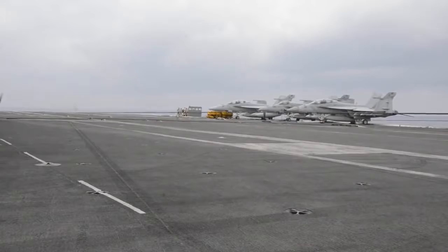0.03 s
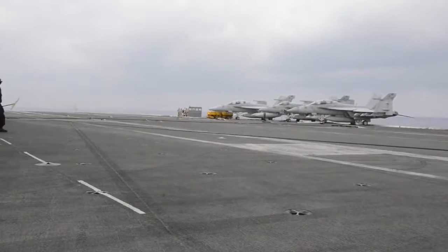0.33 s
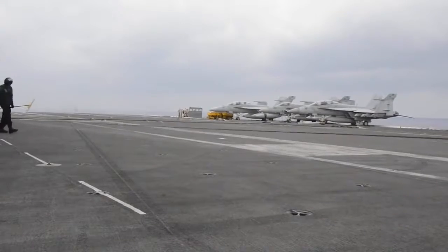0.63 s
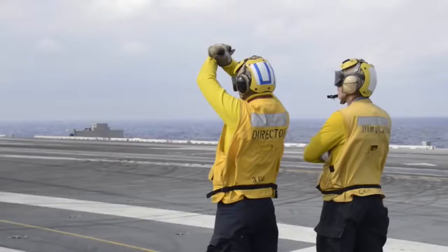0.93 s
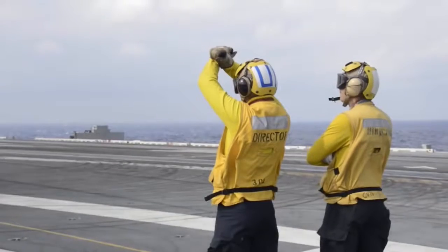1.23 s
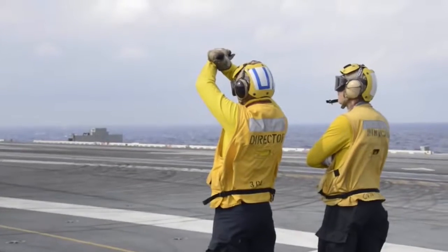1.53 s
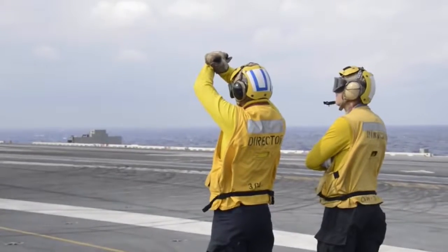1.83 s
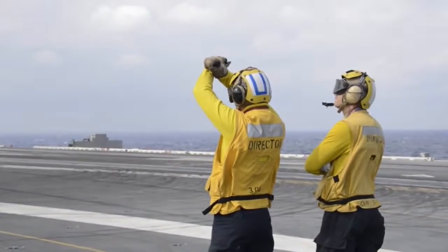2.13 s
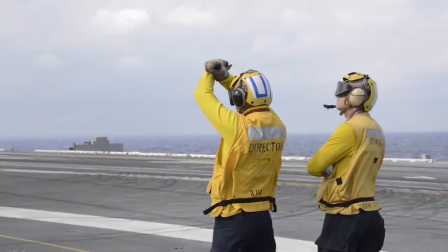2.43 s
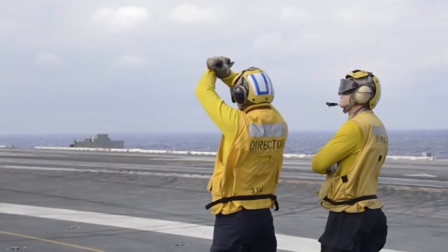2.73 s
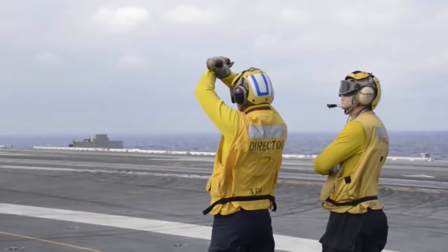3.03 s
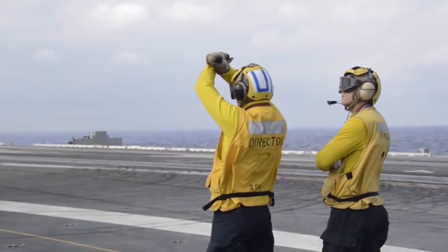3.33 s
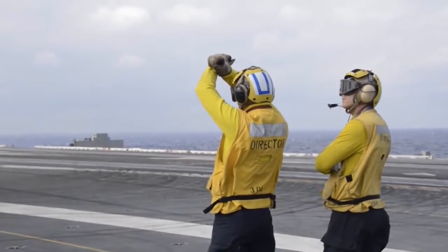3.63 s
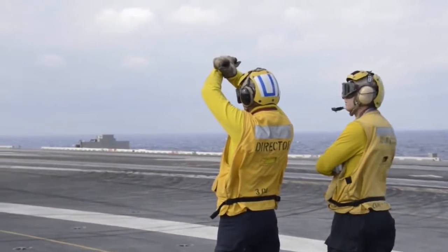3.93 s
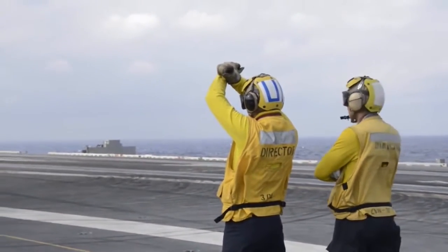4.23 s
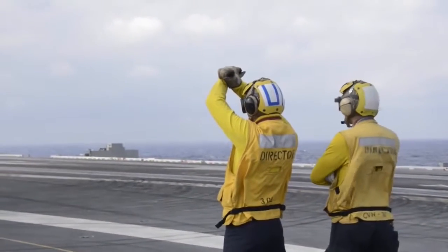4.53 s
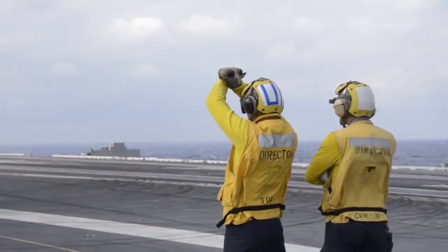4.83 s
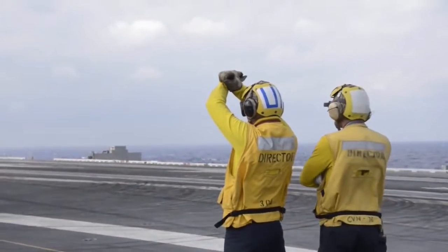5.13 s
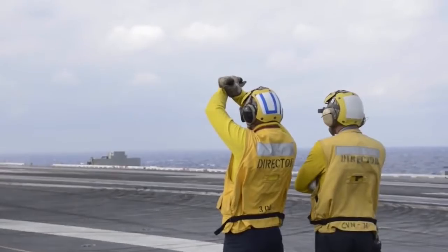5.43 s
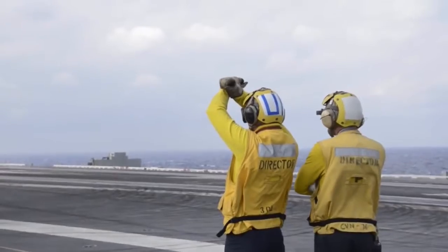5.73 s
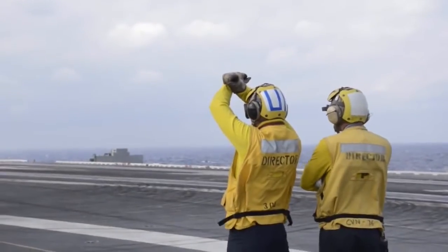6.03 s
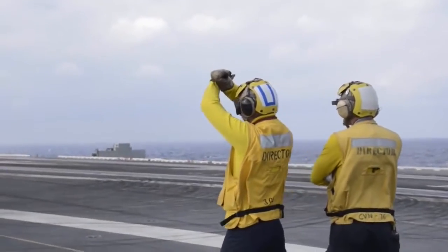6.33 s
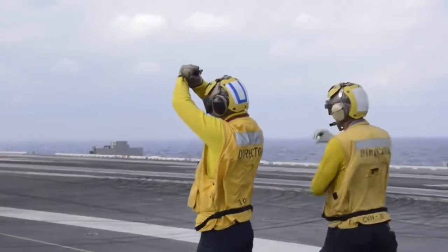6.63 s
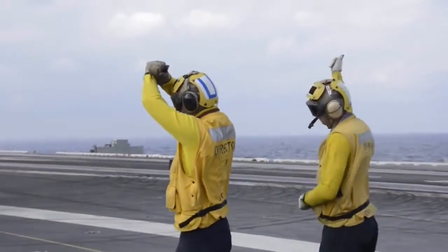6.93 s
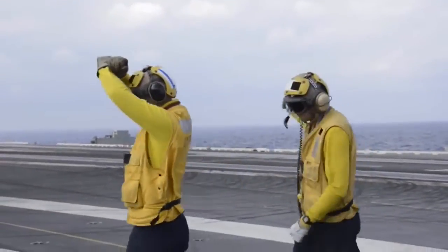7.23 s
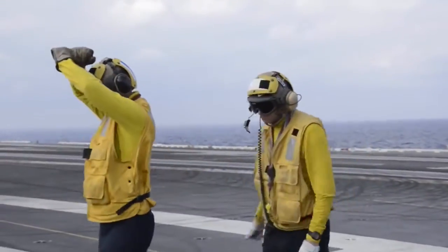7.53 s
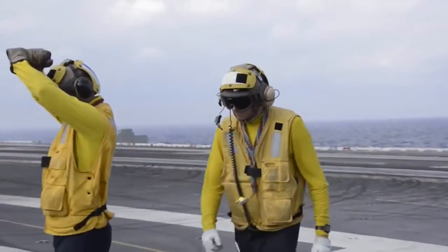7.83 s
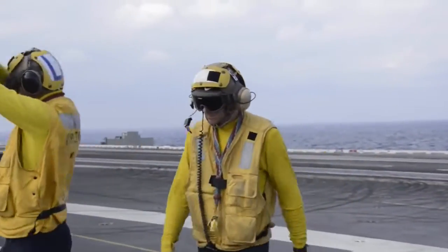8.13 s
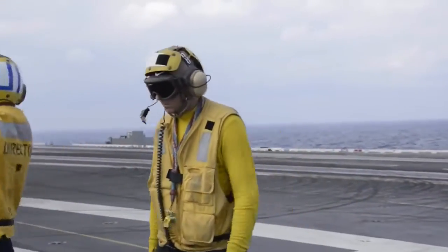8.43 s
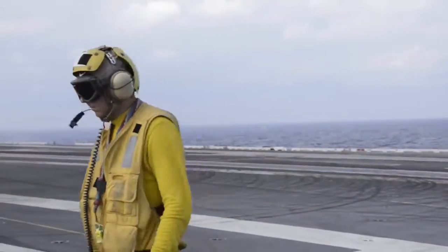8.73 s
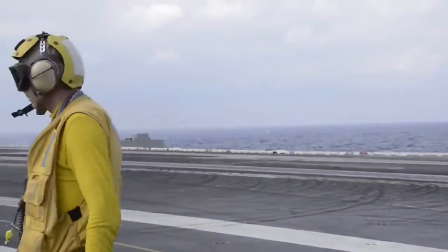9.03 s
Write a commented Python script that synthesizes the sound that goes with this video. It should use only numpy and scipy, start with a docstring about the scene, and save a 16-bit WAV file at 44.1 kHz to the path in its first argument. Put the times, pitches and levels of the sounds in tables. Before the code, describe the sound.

Overloaded jet engine roar stops abruptly; idling turbines whine in light wind before a passing jet swells and recedes.

```python
"""On a carrier's flight deck, a jet at full power overloads the microphone, then cuts dead at 0.9 s.
The open deck follows: idling turbines whine over the ship's hum while wind bumps the microphone.
From about 2.4 s a jet flies past, its roar swelling and fading in the turbulent air and sweeping
against its own echo off the steel deck. Toward the end the hiss recedes and it sinks to a rumble."""
import sys
import numpy as np
from scipy import signal
from scipy.fft import rfft, irfft, next_fast_len
from scipy.io import wavfile
from scipy.ndimage import uniform_filter1d, map_coordinates

SR = 44100
rng = np.random.default_rng(int(sys.argv[2]) if len(sys.argv) > 2 else 0)


def wav_record(signal):
    """Record a signal, one row per channel, as 16-bit PCM in the file named by sys.argv[1]."""
    frames = np.transpose(np.atleast_2d(signal))
    bounded = np.clip(frames, -1, 1)
    # unit amplitude maps onto the largest positive 16-bit level
    quanta = np.round(bounded * 32767).astype(np.int16)
    wavfile.write(sys.argv[1], SR, quanta)


N = 404838
TIME = np.arange(N) / SR
FRAMES = np.arange(N // 256 + 5) * 256 / SR  # spectrogram frame times, s
HZ = np.fft.rfftfreq(1024, 1 / SR)  # spectrogram bins


# Exhaust EQ at full power: f/Hz, level/dB
BLAST_EQ = [(25, -29), (60, -30), (100, -13), (180, -4.5), (270, 3.5), (480, 1.5), (900, -5), (1450, -7),
            (2400, -11.5), (3300, -18), (7500, -23.5), (10000, -27.5), (15500, -41.5)]
# Drive into the overload, with low buffeting building up: t/s, level/dB, bass lift/dB
BLAST_DRIVE = [(0, -8, -14), (.3, -11, 5), (.5, -10.5, -5), (.7, -11.5, 8), (.82, -13, 10.5),
               (.89, -14.5, 13.5)]

def full_power_jet(buffet_hz=150, shocks_per_s=260, shock_hz=1800, crackle_db=-17, ceiling=0.46):
    """Exhaust turbulence and steep little shocks, squashed by the overloaded microphone."""
    _, bass_db = follow(BLAST_DRIVE, FRAMES[:, None])
    buffet_db = bass_db / (1 + (HZ / buffet_hz) ** 4)
    roar = unit_rms(spectral_noise(eq_curve(BLAST_EQ, HZ) + buffet_db, patchy_db=0.73))
    shocks = (rng.random(N) < shocks_per_s / SR) * rng.exponential(1, N)
    # each shock jumps at once and relaxes
    crackle = filtered(shocks, lambda f: 1j * f / (shock_hz + 1j * f) ** 2 / (1 + (f / 10500) ** 6))
    level_db, _ = follow(BLAST_DRIVE, TIME)
    flutter_db = 0.62 * drift(5.65, 39.9, TIME)
    pressure = (roar + amp(crackle_db) * unit_rms(crackle)) * amp(level_db - 0.85 + flutter_db)
    return pressure / (1 + (pressure / ceiling) ** 4) ** (1 / 4)  # soft clip


# Flyby EQ, nose-on and tail-on: f/Hz, level/dB
COMING_EQ = [(60, -49), (130, -12.5), (300, 1.5), (750, -1), (1450, -1), (2400, -8), (3400, -17),
             (4400, -28), (6000, -32.5), (8000, -40.5), (9600, -37), (12000, -44), (13700, -40),
             (15700, -45)]
GOING_EQ = [(30, -45), (70, -21.5), (140, -1), (255, -7), (380, -4), (850, -5), (1600, -10), (2100, -13),
            (2650, -20), (3500, -18), (4800, -30), (6700, -28), (8300, -37.5), (15700, -56)]
# Morph between the two: t/s, share of the tail-on EQ/0-1
EQ_MORPH = [(4.6, 0.08), (5.5, 0.42), (6.2, 1), (9.2, 0.76)]
# Bell of tearing hiss that slides down as the nozzle turns into view: t/s, f/Hz, lift/dB
TEAR_BELL = [(3.5, 5410, 1), (4.4, 4970, 5), (4.85, 4900, 7.5), (5.4, 4700, 4.5), (5.85, 4200, 5),
             (6.2, 3700, 3), (7.5, 3400, 4), (8.5, 3570, 5), (9.1, 3540, -1.5)]
# Rumble, roar and hiss bands: bottom f/Hz, top f/Hz
FLYBY_BANDS = [(170, 500), (600, 2200), (2800, 8000)]

def passing_jet(tear_octaves=0.29, flutter_hz=3000, trim_db=0.57, entry_s=2.35, fade_in_s=0.29):
    """Far exhaust noise; the air fades its rumble, roar and hiss, and shakes the treble most."""
    going, = follow(EQ_MORPH, FRAMES[:, None])
    tear_hz, tear_db = follow(TEAR_BELL, FRAMES[:, None])
    colour_db = (1 - going) * eq_curve(COMING_EQ, HZ) + going * eq_curve(GOING_EQ, HZ)
    colour_db += tear_db * np.exp(-(np.log2((HZ + 1) / tear_hz) / tear_octaves) ** 2)
    # a three-point EQ pulls each band toward its fader
    lifts_db = []
    for fader_db, (bottom, top) in zip(band_faders(), FLYBY_BANDS):
        power = (amp(colour_db[:, (HZ > bottom) & (HZ < top)]) ** 2).sum(1)
        lifts_db.append(fader_db - 10 * np.log10(power))
    colour_db += np.array([eq_curve([(380, rumble), (900, roar), (3500, hiss)], HZ)
                           for rumble, roar, hiss in zip(*lifts_db)])
    # the flutter eases as the jet turns away
    flutter_db = (1 - 0.3 * going) * drift(7, 32, FRAMES)[:, None] * 2 * HZ / (HZ + flutter_hz)
    exhaust = spectral_noise(colour_db + flutter_db + trim_db, patchy_db=1.5)
    fade_in = np.clip((TIME - entry_s) / fade_in_s, 0, 1)
    return rasp(exhaust * fade_in)


# Slow fader ride of the pass; the rumble holds to the end: t/s, rumble/dB, roar/dB, hiss/dB
FLYBY_RIDE = [(2.5, -59.5, -57.5, -77), (2.92, -55.5, -45.5, -63.5), (3.3, -52.5, -38.5, -55),
              (3.7, -48.5, -43, -59), (4.4, -46.5, -40.3, -55), (5.0, -44.5, -40, -53),
              (5.5, -46.5, -40.5, -51.5), (6.2, -45.5, -42, -54), (7.3, -44, -44, -58),
              (8.4, -42.5, -43, -60), (9.0, -46, -50, -65.5), (9.18, -42, -48, -66)]
# Swells on top of the ride: peak t/s, half length/s, roar lift/dB, hiss lift/dB
EDDY_SWELLS = [(3.054, 0.081, 2.5, 3), (3.389, 0.047, 10, 9), (3.502, 0.064, 11, 10), (3.937, 0.1, 6.5, 6),
               (4.137, 0.11, 9.5, 12), (4.558, 0.03, 1.5, 4.5), (4.86, 0.13, 4.5, 9.5), (5.14, 0.15, 4, 7),
               (5.367, 0.084, 5.5, 7), (5.65, 0.11, 1.5, 5.5), (5.837, 0.026, 0, 5.5),
               (5.996, 0.026, 5, 5.5), (6.09, 0.021, -1.5, 3.5), (6.29, 0.054, -0.5, 3.5),
               (6.594, 0.049, 7, 0.5), (7.206, .09, 5.5, 3), (7.494, 0.037, 4, 8), (7.903, 0.062, 5, 5.5),
               (8.58, 0.2, 5, 1.5)]

def band_faders(rumble_share=0.23):
    """Rumble, roar and hiss in dB: the slow pass, swelling as eddies focus the sound on the deck."""
    rumble, roar, hiss = follow(FLYBY_RIDE, FRAMES)
    for peak_s, half_s, roar_db, hiss_db in EDDY_SWELLS:
        swell = np.exp(-((FRAMES - peak_s) / half_s) ** 2)
        rumble += rumble_share * roar_db * swell  # long waves are hardly focused
        roar += roar_db * swell
        hiss += hiss_db * swell
    return rumble, roar, hiss


def rasp(exhaust, depth_db=2.2, corner_hz=3500):
    """The exhaust's top end tears in millisecond bursts."""
    treble = filtered(exhaust, lambda f: f ** 2 / (f ** 2 + corner_hz ** 2))
    bursts = unit_rms(amp(depth_db * drift(110, 900, TIME)))
    return exhaust + treble * (bursts - 1)


# Delay of the deck bounce, longest when the jet stands highest: t/s, lag/ms
BOUNCE_DELAY = [(2.6, .95), (3.1, 1.15), (3.4, 1.8), (4.05, 2.55), (4.7, 3.55), (5.15, 3.98), (5.8, 4.4),
                (6.4, 4.42), (7.5, 3.9), (8.1, 3.35), (9.2, 3.25)]

def deck_echo(direct, dull_hz=1500, lag_rad=0.43, base_gain=0.35, abeam_s=5.12, abeam_half_s=0.79):
    """The steel deck returns a duller copy; its moving delay sweeps a flanging comb through the roar."""
    lag_ms, = follow(BOUNCE_DELAY, TIME)
    lag_ms += 0.06 * drift(2, 14, TIME)  # turbulence bends the paths and blurs the upper teeth

    def rolloff(f):
        return 1 / np.hypot(1, f / dull_hz)

    # the bounce dulls the treble and holds back the phase of the bass
    bounce = filtered(direct, lambda f: rolloff(f) * np.exp(-1j * lag_rad * rolloff(f)))
    echo = map_coordinates(bounce, [(TIME - lag_ms / 1000) * SR], order=3)
    # strongest while the jet is abeam, over bare steel
    echo_gain = base_gain + 0.27 * np.exp(-((TIME - abeam_s) / abeam_half_s) ** 2)
    # direct sound and echo share the power
    return filtered(direct + echo_gain * echo, lambda f: 1 / np.hypot(1, base_gain * rolloff(f)))


# Wind thumps: peak t/s, half length/s, level/dB, low-pass f/Hz
WIND_BUMPS = [(1.038, 0.068, -52, 357), (1.205, 0.025, -50.5, 260), (1.56, 0.0093, -47, 150),
              (1.607, 0.013, -41, 230), (1.622, 0.0095, -43.5, 750), (2.024, 0.0022, -42.5, 900),
              (2.08, 0.04, -49, 420), (2.142, 0.015, -40.5, 298), (2.269, 0.024, -46, 480),
              (2.82, 0.015, -49, 270), (5.76, 0.15, -51, 130), (6.037, 0.023, -49, 100),
              (6.442, 0.021, -39, 130), (6.647, 0.068, -48, 150), (7.61, 0.059, -49, 120)]

def wind(low_cut_hz=70, steepness=2.75):
    """Eddies strike the microphone in short, low puffs."""
    bumps = np.zeros(N)
    for peak_s, half_s, db, corner_hz in WIND_BUMPS:
        puff = filtered(rng.standard_normal(N),
                        lambda f: f / np.hypot(f, low_cut_hz) / (1 + (f / corner_hz) ** steepness))
        bumps += amp(db) * unit_rms(puff) * np.exp(-((TIME - peak_s) / half_s) ** 2)
    return bumps


# Steady whines of the idling turbines: f/Hz, half width/Hz, level/dB
IDLE_WHINES = [(745, 25, -72), (1558, 20, -66.5), (1990, 50, -77), (3120, 60, -81), (4985, 50, -74.5),
               (5950, 90, -80), (6940, 90, -87)]
# Turbine whistles, exhaust howls, and low drones where the deck echo reinforces the jet's roar:
# peak t/s, sigma/s, f/Hz, half width/Hz, level/dB
SWELLING_TONES = [(1.044, 0.11, 1553, 4.3, -56), (1.075, .06, 3100, 27, -64), (1.32, 0.05, 1550, 12, -61),
                  (2.42, 0.12, 1540, 28, -60), (3.1, 0.05, 867, 68, -40), (4.037, 0.078, 710, 57, -38),
                  (5.302, 0.06, 487, 49, -41.5), (7.6, 0.42, 251, 27, -43.5), (7.7, 1, 11100, 520, -72.5),
                  (7.724, .08, 4990, 130, -67), (8.15, .2, 6750, 220, -71), (8.51, 0.39, 279, 46, -42)]
# Duck on the whines and the hum as the jet arrives: t/s, level/dB
IDLE_DUCK = [(0.9, 0), (2.6, -1.5), (3.6, -4), (9.2, -4)]

def tones_and_hum():
    """Idle whines and passing whistles, howls and low drones waver above the ship's hum."""
    duck_db, = follow(IDLE_DUCK, TIME)
    hum = amp(duck_db) * ship_hum()
    tones = amp(duck_db) * sum(amp(db) * fuzzy_tone(hz, width) for hz, width, db in IDLE_WHINES)
    for peak_s, sigma_s, hz, width, db in SWELLING_TONES:
        swell = np.exp(-((TIME - peak_s) / sigma_s) ** 2 / 2)
        tones += amp(db) * swell * fuzzy_tone(hz, width)
    waver_db = 0.2 * drift(3.3, 11, TIME)
    return tones * amp(waver_db) + hum


def ship_hum(hz=87, level_db=-58.5, waver_db=4.0):
    """The ship's machinery drones on one low note, wobbling in pitch and level."""
    cycles = hz * TIME + 0.2 * drift(0.5, 5, TIME)
    waver = amp(waver_db * drift(0.834, 4, TIME))
    return amp(level_db) * unit_rms(np.sin(2 * np.pi * cycles) * waver)


# EQ of the ambience bed: f/Hz, level/dB
WASH_EQ = [(25, -2), (60, -4), (90, 2.5), (180, -2), (260, -8.5), (500, -9.5), (1000, -8.5), (1800, -15),
           (2600, -18.5), (4000, -21.5), (6500, -29), (10000, -32), (13000, -34), (15500, -44)]

def deck_wash(level_db=-54):
    """Distant machinery and sea air blend into a steady bed."""
    return amp(level_db) * unit_rms(spectral_noise(eq_curve(WASH_EQ, HZ), patchy_db=0.2))


def amp(db):
    """Decibels to gain."""
    return 10 ** (np.asarray(db) / 20)


def unit_rms(x):
    """Scales to rms 1."""
    return x / np.sqrt(np.mean(x ** 2) + 1e-20)


def eq_curve(points, hz):
    """An EQ table's dB at hz, interpolated on a log-frequency axis."""
    f, db = np.transpose(points)
    return np.interp(np.log(hz + 1), np.log(f), db)


def follow(rows, t):
    """Every lane of an automation table at the times t."""
    times, *lanes = np.transpose(rows)
    return [np.interp(t, times, lane) for lane in lanes]


def filtered(x, gain):
    """Filters x by a gain that is a function of frequency."""
    size = next_fast_len(len(x))
    return irfft(rfft(x, size) * gain(np.fft.rfftfreq(size, 1 / SR)), size)[:len(x)]


def drift(slow_hz, fast_hz, t):
    """A random LFO of rms 1 between two rates."""
    rates = np.geomspace(slow_hz, fast_hz, num=30)
    return unit_rms(sum(np.sin(2 * np.pi * (f * t + rng.random())) / np.sqrt(f) for f in rates))


def spectral_noise(field_db, patchy_db):
    """Noise painted from a frames x bins level field, mottled with random patches."""
    real, imag, patches = rng.standard_normal((3, len(FRAMES), len(HZ)))
    patches = uniform_filter1d(patches, size=14, axis=0)
    patches = unit_rms(uniform_filter1d(patches, size=16, axis=1))
    spectra = (real + 1j * imag) * amp(field_db + patchy_db * patches)
    _, noise = signal.istft(spectra.T, nperseg=1024, noverlap=768)
    return noise[:N] / np.sqrt(2 / 3)


def fuzzy_tone(hz, half_width_hz):
    """Noise in one narrow resonance."""
    return unit_rms(filtered(rng.standard_normal(N), lambda f: 1 / (1 + ((f - hz) / half_width_hz) ** 2)))


def scene(cut_s=0.896):
    """The full-power roar, then a hard cut to the open deck and the flyby."""
    open_deck = deck_wash() + tones_and_hum() + wind() + deck_echo(passing_jet())
    before_cut = np.clip((cut_s - TIME) / 0.002, 0, 1)
    return (before_cut * full_power_jet() + (1 - before_cut) * open_deck)[None]


def record(dry, low_cut_hz=42, high_cut_hz=15720):
    """The microphone's low cut and the recorder's band limit."""
    thinned = filtered(dry[0], lambda f: f ** 2 / np.hypot(f ** 2, low_cut_hz ** 2))
    low_pass = signal.firwin(511, high_cut_hz, window=("kaiser", 9), fs=SR)
    return signal.oaconvolve(thinned, low_pass, "same")[None]


dry = scene()
out = record(dry)
wav_record(out)
```